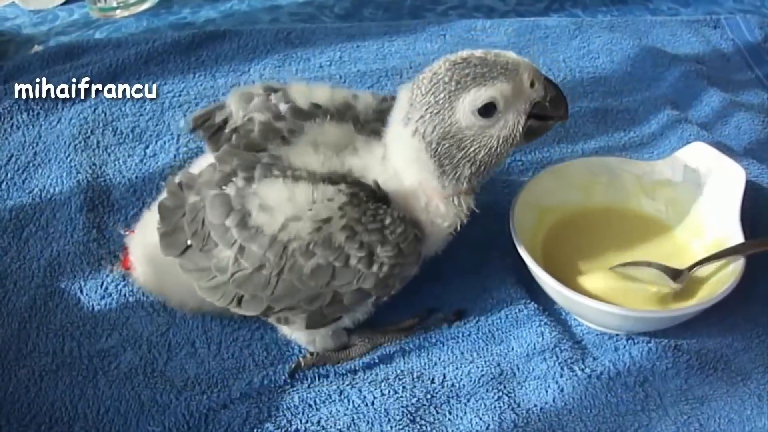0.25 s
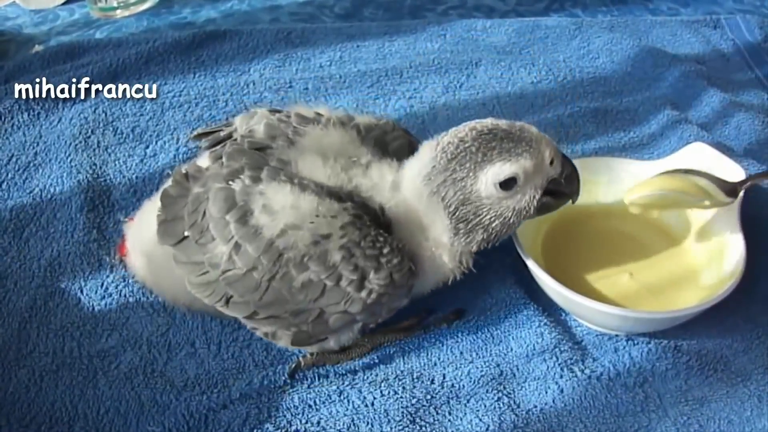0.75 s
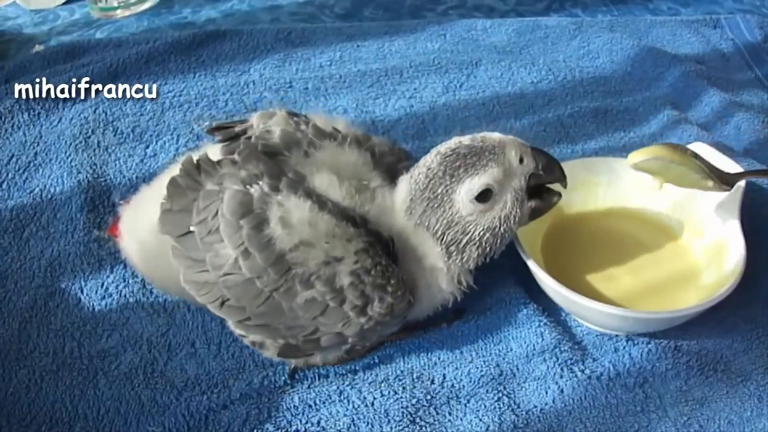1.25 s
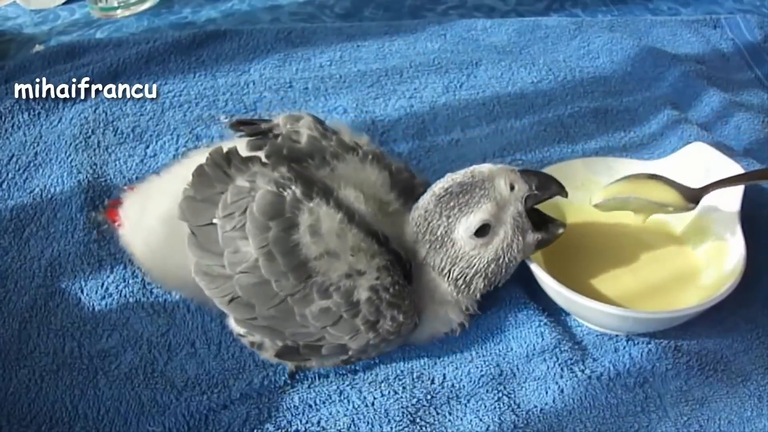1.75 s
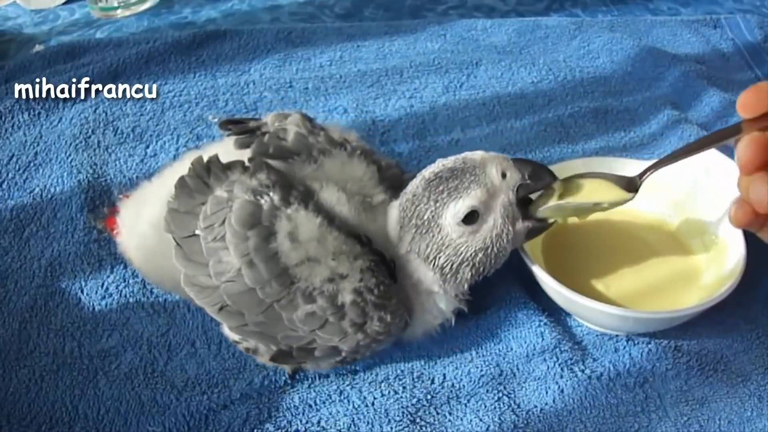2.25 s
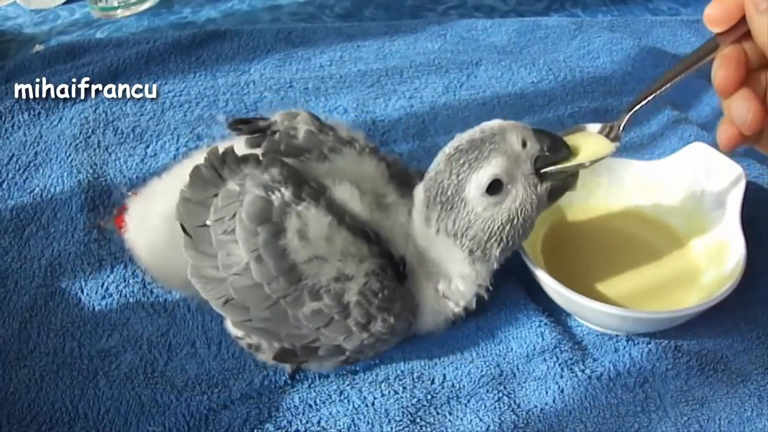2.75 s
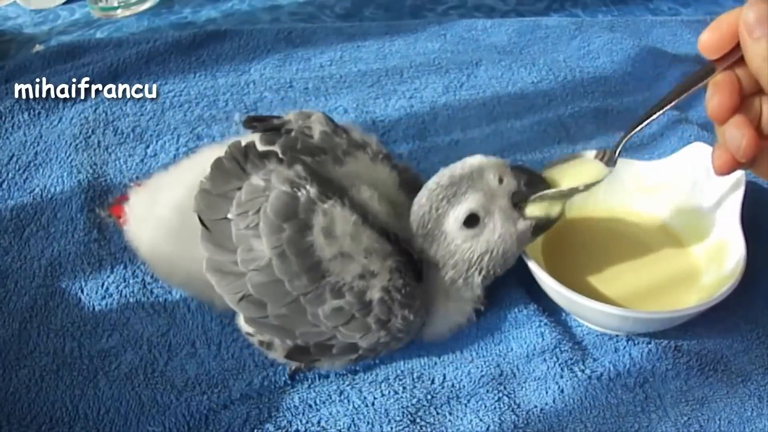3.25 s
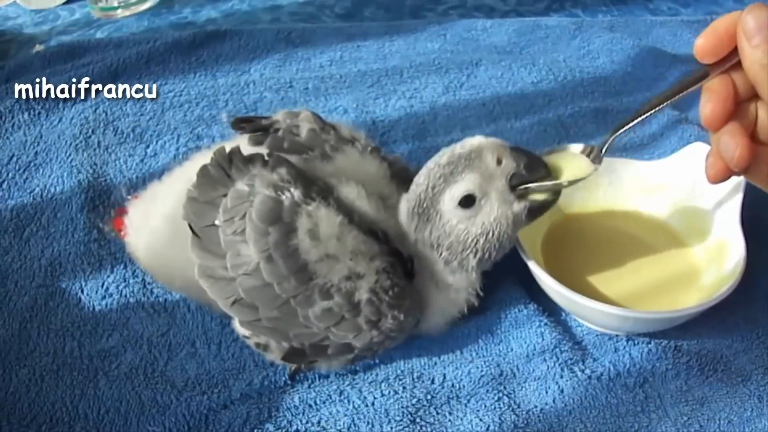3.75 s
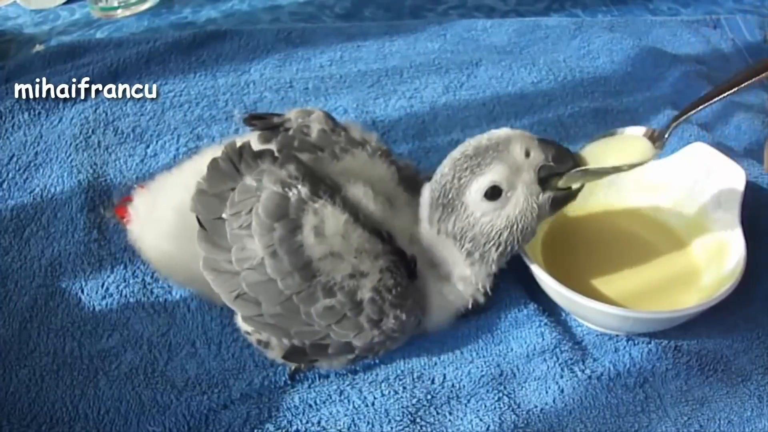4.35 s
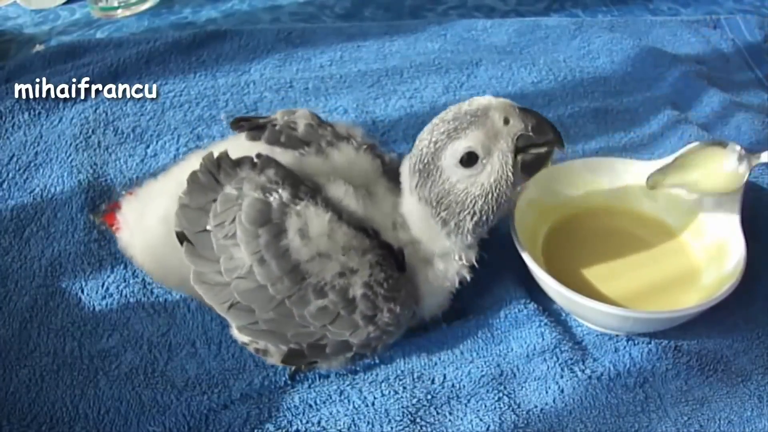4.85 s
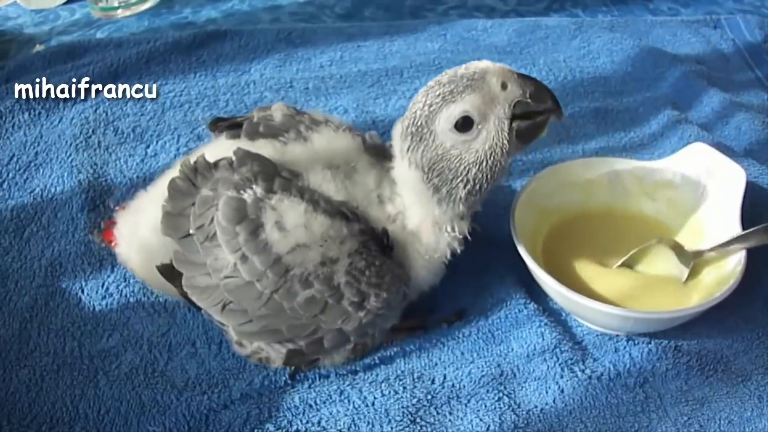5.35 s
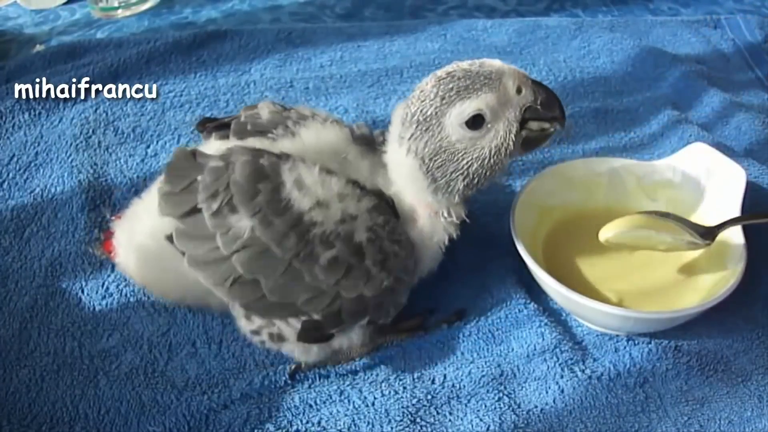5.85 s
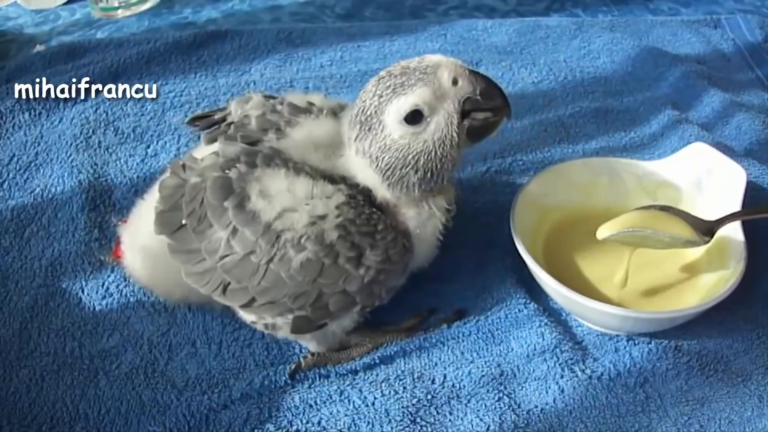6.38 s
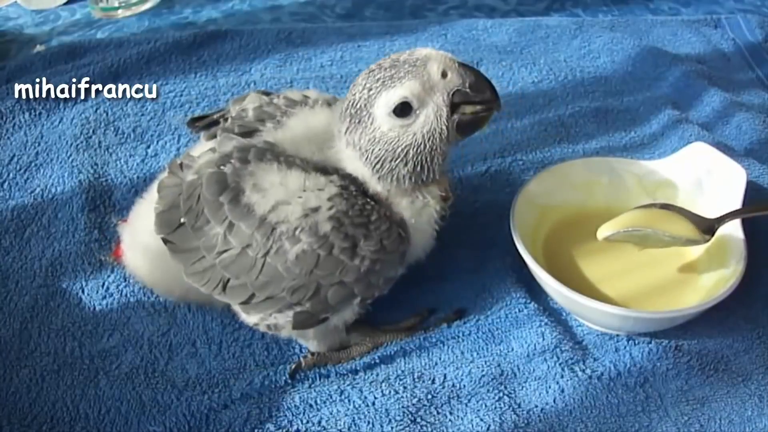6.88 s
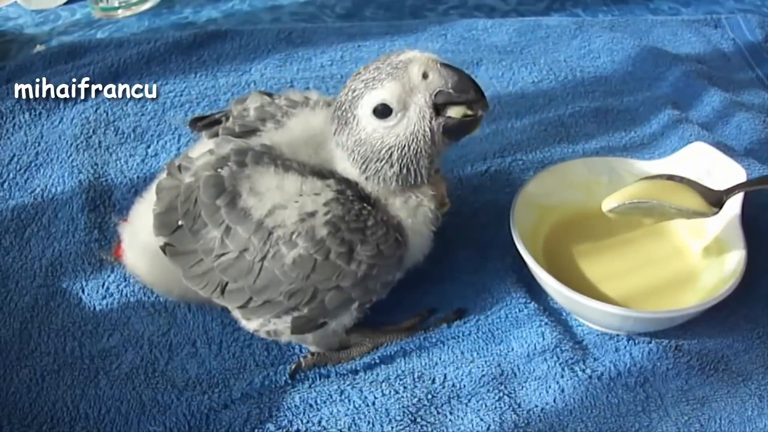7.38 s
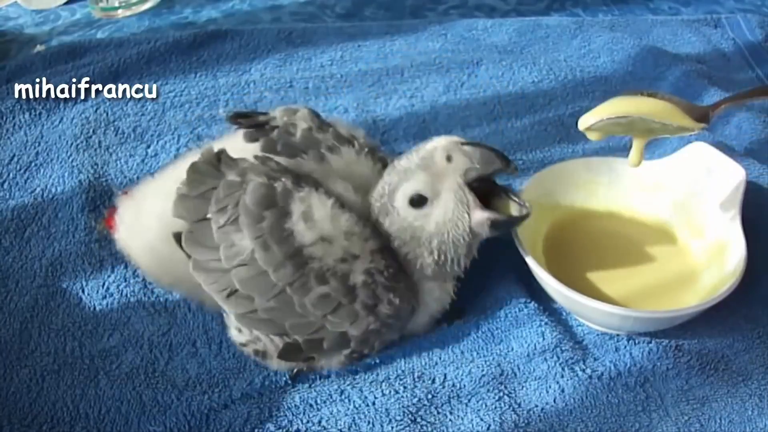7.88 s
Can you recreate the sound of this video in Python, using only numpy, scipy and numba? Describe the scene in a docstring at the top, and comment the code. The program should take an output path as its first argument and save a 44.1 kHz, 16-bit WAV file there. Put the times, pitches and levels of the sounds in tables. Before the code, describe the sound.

A hungry young parrot is spoon-fed near the microphone indoors. Raspy, nasal begging calls open the scene after a sharp spoon tap; small dry and wet beak clicks and two hollow knocks fill the feeding. Later a quick cluster of ringing taps and gritty scrapes comes from the china bowl, then short high squeaks and a hoarse call. Steady faint room hiss with slight hum and a short reverberant tail.

```python
"""Parrot chick fed from a spoon

A parrot chick begs in short, hoarse squawks while it is spoon-fed on a towel in a quiet room.
Its calls are harmonics of a gliding pitch plus rasping air, filtered by throat and beak.
Its wet beak clicks and knocks: filtered pops and the damped modes of a hollow body.
The spoon taps and scrapes a china bowl of formula: stick-slip noise and taps drive ringing modes."""
import sys
import numpy as np
from scipy import signal
from scipy.fft import rfft, irfft, next_fast_len
from scipy.io import wavfile
from numba import njit

SR = 44100
rng = np.random.default_rng(int(sys.argv[2]) if len(sys.argv) > 2 else 0)


def to_wav(sig):
    """Store sig (one row per channel, or 1-D mono) as 16-bit WAV at the path in sys.argv[1].

    Samples outside -1..1 are clipped; the rate is SR.
    """
    pcm = np.clip(np.atleast_2d(sig), -1, 1) * 32767
    pcm = np.round(pcm).astype(np.int16)
    wavfile.write(sys.argv[1], SR, pcm.T)  # frames by channels


N = 358091


def amp(db):
    """Logarithmic level: decibels to linear gain."""
    return 10 ** (np.asarray(db) / 20)


def unit(x):
    """Normalisation: scales a signal to an rms of one."""
    return x / np.sqrt(np.mean(x ** 2) + 1e-20)


def read(points, hz):
    """Logarithmic frequency scale: interpolates a table of (frequency, value) along it."""
    f, value = np.transpose(points)
    return np.interp(np.log(hz + 1), np.log(f + 1), value)


def add(mix, s, sound):
    """Superposition: adds a sound to the mix at time s."""
    part = mix[round(s * SR):][:len(sound)]
    part += sound[:len(part)]


def colour(x, points):
    """Minimum-phase filtering: the Hilbert transform of the log gain gives the causal phase."""
    size = 2 * next_fast_len(len(x))
    gain_db = read(points, abs(np.fft.fftfreq(size, 1 / SR)))
    log_gain = np.log(amp(np.maximum(gain_db, -100)))
    response = np.exp(signal.hilbert(log_gain).conj())[:size // 2 + 1]
    return irfft(rfft(x, size) * response, size)[:len(x)]


def band(x, hz, octaves, order=1):
    """Band-pass filtering: keeps the given half width in octaves on either side of hz."""
    edges = [min(hz / 2 ** octaves, SR / 3), min(hz * 2 ** octaves, SR / 2 - 100)]
    return signal.sosfilt(signal.butter(order, edges, "band", fs=SR, output="sos"), x)


def wander(size, hz):
    """Random fluctuation: low-passed noise of rms one, up to about hz."""
    f = np.fft.rfftfreq(size, 1 / SR)
    return unit(irfft(rfft(rng.standard_normal(size)) * np.exp(-(f / hz) ** 2), size))


def gate(t, length, attack, release):
    """Amplitude envelope: rises, holds and falls to zero at the given length."""
    return np.clip(t / attack, 0, 1) * np.clip((length - t) / release, 0, 1)


def ring(modes, low_hz, top_hz, factor=1, size=2048):
    """Modal decay of a small, damped body: its size limits the bass, the contact time the treble."""
    t = np.arange(size) / SR
    x = np.zeros(size)
    for hz, db, t60 in modes:
        x += amp(db - 60 * t / t60) * np.sin(2 * np.pi * hz * factor * t)
    x = band(x, np.sqrt(low_hz * top_hz), np.log2(top_hz / low_hz) / 2, order=3)
    return x / abs(x).max()


# spectrum of the room's air noise: frequency_hz, relative_density_db (per Hz)
AIR_SPECTRUM = [(15, -63), (25, -28), (64, -19), (92, -21), (115, -12.5), (149, -8.5), (207, -2.5),
                (254, -4), (288, -2.5), (372, -3), (635, -5.5), (1000, -6.5), (1850, -10.5), (2000, -12),
                (11000, -23.5), (14300, -123), (22000, -120)]
# appliance hum partials: frequency_hz, rms_level_db
HUM_PARTIALS = [(125, -67.5), (199, -72.5), (295, -65.5)]
AIR_DB = -49.5  # rms


def room_tone():
    """Stationary noise: filtered air noise with a faint hum whose phase wavers."""
    t = np.arange(N) / SR
    hum = np.zeros(N)
    for hz, db in HUM_PARTIALS:
        hum += amp(db) * np.sqrt(2) * np.sin(2 * np.pi * hz * t + 0.28 * wander(N, 3.5))
    return amp(AIR_DB) * unit(colour(rng.standard_normal(N), AIR_SPECTRUM)) + hum


# wet clicks of beak and tongue: start_s, peak_db, centre_hz, half_width_octaves
BEAK_CLICKS = [(0.328, -28.5, 2800, 0.8), (1.72, -24.5, 3020, 0.55), (2.2677, -25.5, 3020, 0.65),
               (2.3522, -29, 3000, 0.61), (2.8068, -24.5, 2200, 1), (2.925, -11.5, 7050, 1.8),
               (2.9713, -26.5, 2820, 0.87), (3.203, -21.5, 2300, 0.89), (3.4195, -22.5, 2500, 0.86),
               (3.4266, -26.5, 6900, 0.3), (3.632, -24.5, 3970, 1.04), (3.8185, -23.5, 3870, 0.71),
               (3.988, -22, 3780, 0.82), (4.053, -24.5, 2200, 0.5), (4.144, -26.5, 5653, 0.36),
               (4.2783, -21.5, 5850, 0.56), (4.3944, -25.5, 5930, 0.54), (4.425, -19, 2770, 0.25),
               (4.5465, -17.5, 5000, 0.27), (4.5981, -21.5, 2530, 0.075), (4.682, -17, 7000, 1.9),
               (4.761, -17, 5700, 1.82), (5.2094, -32.5, 6400, 0.29), (5.9491, -28.5, 3930, 0.62),
               (7.2761, -22.5, 3830, 1.5), (7.744, -24, 2760, 0.65), (8.013, -31, 2800, 0.5),
               (8.0816, -25.5, 2620, 0.67)]
# modes of the hollow beak: frequency_hz, relative_level_db, t60_s
BEAK_MODES = [(403, 0, 0.0088), (1030, 4, 0.023), (1370, 8, 0.0056), (1526, -21, 0.27), (1920, -4, 0.017),
              (2950, -9.5, 0.016), (4030, -47, 0.0037)]
CLICK_DECAY_S = 0.0023


def click(s, db, hz, octaves, decay, crackle=0.11, body_db=-14, size=1024):
    """Impulse excitation: a contact pops and crackles; deeper ones knock the hollow beak more."""
    snap = crackle * rng.standard_normal(size) * np.exp(-np.arange(size) / SR / decay)
    snap[0] = 1
    pop = band(snap, hz, octaves, order=2)
    body = amp(body_db) * (2500 / hz) ** 2 * ring(BEAK_MODES, 300, 4500, size=size)
    x = pop / abs(pop).max() + body
    return s, amp(db) * x / abs(x).max()


# modes of the steel spoon: frequency_hz, relative_level_db, t60_s
SPOON_MODES = [(2200, -107, .012), (3740, 31.5, 0.015), (4790, 36, 0.011), (5320, 15, 0.012),
               (5310, 17, 0.011), (6940, -25, 0.023)]


def tap(s, spoon_db):
    """Impact on a resonator: the spoon's modes ring under the gritty splash of the contact."""
    x = amp(spoon_db) * ring(SPOON_MODES, low_hz=1010, top_hz=8100)
    add(x, 0, click(s, spoon_db - 2, 5130, 0.41, 0.0028)[1])
    return s, x


# spoon taps on the bowl: start_s, spoon_peak_db, bowl_drive_db, hardness_hz, spread_octaves
SPOON_TAPS = [(.151, -3.5, -23.5, 1980, 0.67), (3.107, -60, -55.5, 6630, 0.021),
              (3.321, -60, -55.5, 6670, 0.025), (3.479, -60, -56, 6610, 0.021),
              (5.329, -10, -12.5, 4670, 0.24), (5.4056, -18, -25, 4370, 0.18)]
# modes of the china bowl: frequency_hz, level_db, t60_s,
# then, at full spoon pressure: pitch_rise_hz, added_width_hz
BOWL_MODES = [(2255, -18.5, 0.85, 110, 110), (2455, -19, 0.35, 460, 30), (3640, -35, 0.11, 220, 100),
              (4290, -6.5, 0.2, 244, 30), (4480, -12, 0.18, 140, 35), (6550, -11, 0.41, 75, 59),
              (6680, 10.5, 0.096, 18, 18), (9370, 2, 0.093, 204, 14)]
# pressure of the spoon on the bowl: time_s, pressure (0-1)
SPOON_PRESSURE = [(5.3, 0), (5.32, 0.6), (5.42, 0.72), (5.503, 0.84), (5.52, 0.05), (5.54, 0.03)]


def bowl(rub, rub_db=-22):
    """Forced modal vibration: taps and rubbing ring the china; pressure raises and damps its modes."""
    press = np.clip(np.interp(np.arange(N) / SR, *np.transpose(SPOON_PRESSURE)), 0, 1)
    out = np.zeros(N)
    for hz, db, t60, rise_hz, width_hz in BOWL_MODES:
        force = amp(rub_db) * rub
        for s, _, tap_db, hard_hz, spread in SPOON_TAPS:
            # a tap feeds the modes near its hardness most
            distance = np.log2(hz / hard_hz) / spread
            add(force, s, [amp(tap_db) / (1 + distance ** 2)])
        loss = np.log(1000) / t60 + np.pi * width_hz * press
        pole = np.exp((2j * np.pi * (hz + rise_hz * press) - loss) / SR)
        out += amp(db) * resonate(force, pole)
    return out


@njit
def resonate(force, pole):
    """Damped oscillator: one mode whose pitch and damping may change from sample to sample."""
    out, state = np.zeros(len(force)), 0j
    for i in range(len(force)):
        state = state * pole[i] + force[i] + 1e-20
        out[i] = state.imag
    return out


# strokes of the spoon along the china:
# start_s, length_s, level_db, fade_db (over the stroke; positive swells)
SPOON_SCRAPES = [(0.335, .06, -51.5, -2), (5.327, 0.018, -28, -9), (5.359, .016, -41, -1),
                 (5.383, .008, -34, -5), (5.402, 0.0095, -33.5, -5), (5.436, 0.013, -31.5, 0.5),
                 (5.454, 0.057, -26, -3.5), (5.51, 0.0258, -24.5, -4.5)]
# spectrum of a firm stroke: frequency_hz, relative_level_db
GRIT_SPECTRUM = [(300, -62), (1300, -26), (1900, -8.5), (2850, -0.5), (3600, -11.5), (5000, -10.5),
                 (6000, -25.5), (8000, -19.5), (11000, -30.5)]
# the edge bites, chatters along the glaze and lets go
BITE_S, LET_GO_S, CHATTER_DB, CHATTER_HZ = 0.0026, 0.0029, 1.5, 120


def scrape(s, length, db, fade_db, slips_per_s=1300, hiss=0.14, firm_db=-25):
    """Stick-slip friction: the edge slips at random on the glaze; only a firm stroke carries treble."""
    t = np.arange(0, length, 1 / SR)
    force_db = db + fade_db * t / length + CHATTER_DB * wander(len(t), CHATTER_HZ)
    force = amp(force_db) * gate(t, length, BITE_S, LET_GO_S)
    slips = (rng.random(len(t)) < slips_per_s / SR) + hiss * rng.standard_normal(len(t))
    grit = unit(colour(slips - slips.mean(), GRIT_SPECTRUM))
    dull = unit(band(grit, 2400, 0.31))
    firm = np.minimum(force / amp(firm_db), 1) ** 1.6
    return s, force * (firm * grit + (1 - firm) * dull)


def syrinx(hz, even_db, bright_db, rough, sharp_db, rasp_db, jitter=0.073, shimmer=0.68,
           flutter_hz=380, doubling=0.24, fall_db=-11, hiss=0.34):
    """Self-sustained vibration: rough cycles jitter, alternate in strength and chop air into rasp."""
    size = len(hz)
    phase = 2 * np.pi * (np.cumsum(hz) / SR + jitter * rough * wander(size, flutter_hz))
    buzz = np.zeros(size)
    for k in range(1, 9):
        harmonic_db = even_db * (k % 2 == 0) + bright_db * (k > 2) + sharp_db * (k > 3)
        harmonic_db = harmonic_db + fall_db * max(k - 5, 0)
        buzz += amp(harmonic_db) * np.sin(k * phase)
    # cos(phase / 2) makes every other cycle stronger
    buzz *= 1 + rough * (shimmer * wander(size, flutter_hz) + doubling * np.cos(phase / 2))
    air = rng.standard_normal(size)
    rasp = (unit(band(air, 3170, 0.32)) + hiss * air) * (1 + 0.57 * np.cos(phase))
    return np.sqrt(2) * buzz + amp(rasp_db) * 2 * rough * rasp


def step(t):
    """Sigmoid transition: a smooth rise from 0 to 1 around time zero."""
    return .5 + .5 * np.tanh(t / (2 * SLIDE_S))


# begging calls: start_s, length_s, attack_s,
# level_db (before the throat), fade_db (over the call; positive swells),
# base pitch: opening_hz, after_first_push_hz, after_last_push_hz,
# first_push_s, last_push_s (from the start), last_push_strength (0-1),
# even_harmonics_db, brightness_db, roughness (0-1), syrinx_sharpness_db
BEGGING_CALLS = [(0.398, 0.067, 0.0075, -28, 1, 866.5, 830, 780, 0.029, 0.04, 0.3, -3, -4, 0.43, -4),
                 (0.954, .200, 0.0063, -22, -8, 1040, 772, 747, .030, 0.15, .9, -4, -2, 0.2, -7.5),
                 (1.789, 0.19, 0.0063, -17.5, -15.5, 1030, 846, 690, .031, .110, 0.7, 0, -3, 0.31, 0.5),
                 (4.125, 0.053, 0.011, -25, -6, 921, 843, 860, 0.019, 0.052, 0, -11, -15.5, 0.12, 2),
                 (4.246, 0.043, 0.0046, -23, -14, 933, 830, 864, 0.016, 0.03, 0, -8.5, -8.5, 0.17, 3),
                 (6.406, .044, 0.017, -24, 1, 1551, 1455, 1390, .016, 0.035, 0.5, -8, -12, 0.2, -4),
                 (6.439, 0.072, 0.006, -24, -4.5, 996, 958, 990, 0.0095, 0.071, 0.1, 0, -7, 0.39, 2),
                 (7.292, 0.13, 0.005, -26, -4.5, 1047, 932, 958, 0.033, 0.11, 0.04, 5, -5, 0.24, 6.5),
                 (8.096, 0.013, 0.0056, -21.5, -3.5, 1734, 1700, 1650, .005, .008, 0, 16.5, -8, 0.2, -14),
                 (8.11, 0.016, 0.0036, -25.5, -3, 1630, 1760, 1300, 0.0055, .012, 0.1, 13, -5, 0.5, -13)]
# response of throat and beak: frequency_hz, gain_db
THROAT_RESPONSE = [(250, -61), (520, -13.5), (720, -4.5), (950, 3.5), (1200, -5), (1500, 3.5), (2150, -3),
                   (2600, 3.5), (3150, -8), (3700, -24.5), (4250, -27), (4850, -21), (5600, -30.5),
                   (7500, -22.5), (11000, -23)]
# the beak closes over the last share of a call: the pitch flicks up (share of it), the sound dulls
CLOSING_SHARE, CLOSING_LIFT, CLOSING_BRIGHT_DB = 0.195, 0.126, -15
# a tight, high syrinx gives weaker even harmonics; the last push brings them out
EVEN_DB_PER_OCTAVE, LAST_PUSH_EVEN_DB = -16, 2
# the pitch slides to a new level, lower or higher, at each push, with a slight quaver (rms share)
SLIDE_S, QUAVER, QUAVER_HZ = 0.00964, .013, 59
# a push makes the call louder and rougher for a moment
PUSH_S, PUSH_DB, PUSH_ROUGH = 0.013, 2.5, 0.12
# the beak gapes around the first push, which brightens the call
GAPE_S, GAPE_BRIGHT_DB = 0.018, 6
# every call swells up from a faint level and dies back to it, and its level trembles (rms dB)
FAINT_DB, RELEASE_S, TREMBLE_DB, TREMBLE_HZ = -18.5, 0.0078, 2, 60
# the roughness grows in from half; air rasps through the syrinx
HOARSE_IN_S, RASP_DB = 0.016, -1


def cry(s, length, attack, level_db, fade_db, open_hz, middle_hz, low_hz, first_s, last_s,
        last_strength, even_db, bright_db, rough, sharp_db):
    """Source and filter: the pitch slides at two pushes and flicks up at the end; the throat colours it."""
    t = np.arange(0, length, 1 / SR)
    last_push = last_strength * np.exp(-((t - last_s) / PUSH_S) ** 2)
    push = np.exp(-((t - first_s) / PUSH_S) ** 2) + last_push
    gape = np.exp(-((t - first_s) / GAPE_S) ** 2)
    closing = np.clip(1 - (1 - t / length) / CLOSING_SHARE, 0, 1)

    slide = open_hz + (middle_hz - open_hz) * step(t - first_s)
    slide += (low_hz - middle_hz) * step(t - last_s)
    hz = slide * (1 + CLOSING_LIFT * closing + QUAVER * wander(len(t), QUAVER_HZ))

    db = level_db + fade_db * t / length + PUSH_DB * push + TREMBLE_DB * wander(len(t), TREMBLE_HZ)
    db += FAINT_DB * (1 - gate(t, length, attack, RELEASE_S))

    even = even_db + EVEN_DB_PER_OCTAVE * np.log2(slide / low_hz) + LAST_PUSH_EVEN_DB * last_push
    bright = bright_db + GAPE_BRIGHT_DB * gape + CLOSING_BRIGHT_DB * closing
    hoarse = rough * np.minimum(.5 + .5 * t / HOARSE_IN_S, 1) + PUSH_ROUGH * push
    source = syrinx(hz, even, bright, hoarse, sharp_db, RASP_DB) * amp(db)
    return s, colour(source, THROAT_RESPONSE)


# soft bumps, squelches and rustles as the chick moves:
# start_s, rms_db (before the swell), centre_hz, half_width_octaves, rise_s, decay_s
CHICK_SHUFFLES = [(1.204, -37, 137, 0.54, 0.002, 0.02), (4.43, -45, 3460, 0.99, 0.0039, 0.057),
                  (4.459, -41.5, 3250, 0.41, 0.02, 0.013), (6.617, -40, 705, 0.24, 0.0077, 0.058)]


def shuffle(s, db, hz, octaves, rise, decay, lumps_db=3):
    """Friction noise: a short, lumpy swell of band-limited grains."""
    t = np.arange(SR // 2) / SR
    swell = np.minimum(t / rise, 1) * np.exp(-np.maximum(t - rise, 0) / decay)
    grains = rng.standard_normal(len(t)) * amp(lumps_db * wander(len(t), 430))
    return s, amp(db) * swell * unit(band(grains, hz, octaves, order=2))


# the beak snaps shut or knocks on the spoon:
# start_s, blow_peak_db, mode_frequency_factor, rebound_gap_s
BEAK_KNOCKS = [(1.7556, -9.5, 1.266, 0.001234), (2.7378, -9.5, 1.04, 0.00197)]


def knock(s, db, factor, gap, rebound=0.45, count=3):
    """Inelastic rebound: the beak closes in quick blows, each weaker by the same factor."""
    x = np.zeros(SR // 10)
    for k in range(count):
        add(x, k * gap, rebound ** k * ring(BEAK_MODES, 374, 7000, factor))
    return s, amp(db) * x


# reverberation of the room: frequency_hz, t60_s
ROOM_DECAY = [(200, 0.27), (900, 0.41), (2500, 0.34), (5000, 0.39), (10000, 0.36)]
# reflection from a nearby surface: delay_s, level_db
EARLY_ECHOES = [(.0101, -19)]


def room(x, wet_db=-17, build_up=0.011):
    """Reverberation: an early echo and a diffuse tail of sparse echoes, each band with its own decay."""
    taps = rng.choice([-1., 1.], SR) * (rng.random(SR) < 4000 / SR)
    hz, t, z = signal.stft(taps, SR, nperseg=256)
    decay = amp(-60 * t / read(ROOM_DECAY, hz)[:, None])
    tail = signal.istft(z * decay, SR, nperseg=256)[1]
    tail *= np.minimum(np.arange(len(tail)) / SR / build_up, 1) ** 2
    tail *= amp(wet_db) / np.linalg.norm(tail)
    for delay, db in EARLY_ECHOES:
        add(tail, delay, [amp(db)])
    return x + signal.fftconvolve(x, tail)[:N]


def scene():
    """Linear mixing: chick, spoon and bowl, each group with its share of the room."""
    voice, beak, feeding, rub = np.zeros((4, N))
    for s, spoon_db, *_ in SPOON_TAPS:
        add(feeding, *tap(s, spoon_db))
    for row in BEAK_CLICKS:
        add(feeding, *click(*row, CLICK_DECAY_S))
    for row in SPOON_SCRAPES:
        add(rub, *scrape(*row))
    for row in BEGGING_CALLS:
        add(voice, *cry(*row))
    for row in CHICK_SHUFFLES:
        add(feeding, *shuffle(*row))
    for row in BEAK_KNOCKS:
        add(beak, *knock(*row))
    feeding += rub + bowl(rub)
    mix = room(voice, wet_db=-12) + room(beak, wet_db=-10.0, build_up=0.0015)
    mix += room(feeding, wet_db=-14) + room_tone()
    return mix[None]


EDGE_HZ = 11200


def record(dry):
    """Band limitation: a linear-phase low-pass at the recorder's upper edge."""
    low_pass = signal.firwin(401, EDGE_HZ, window=("kaiser", 8), fs=SR)
    return signal.oaconvolve(dry, low_pass[None], "same")


dry = scene()
out = record(dry)
to_wav(out)
```